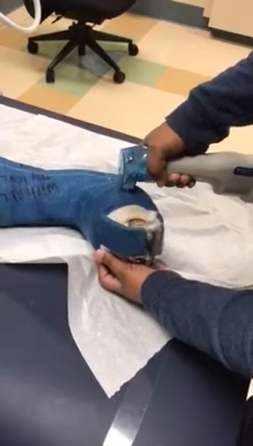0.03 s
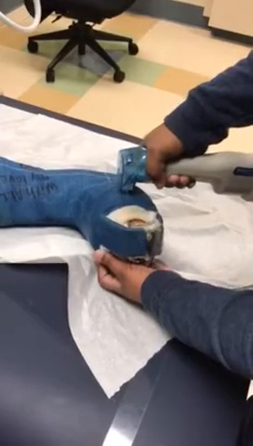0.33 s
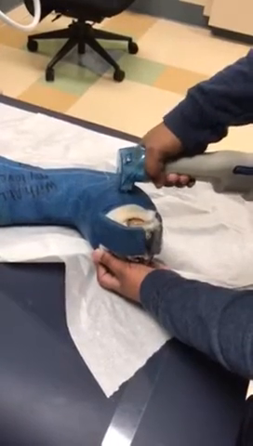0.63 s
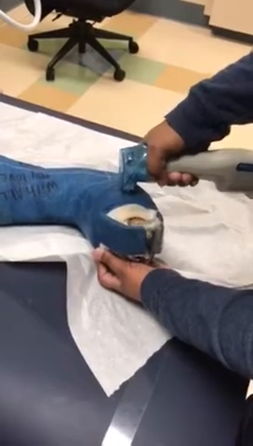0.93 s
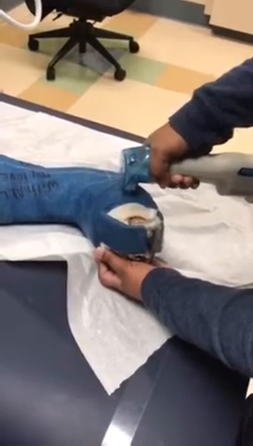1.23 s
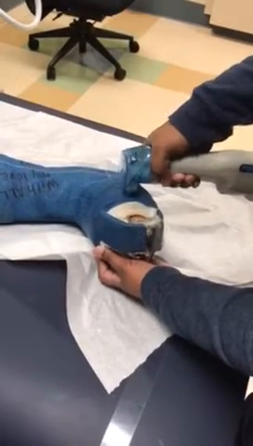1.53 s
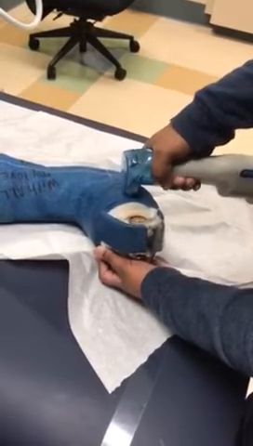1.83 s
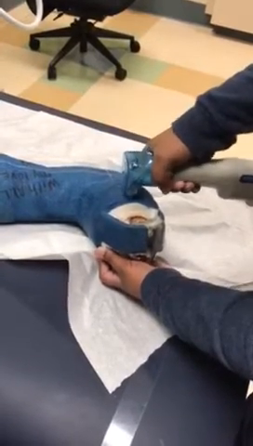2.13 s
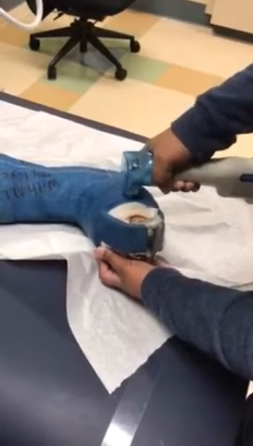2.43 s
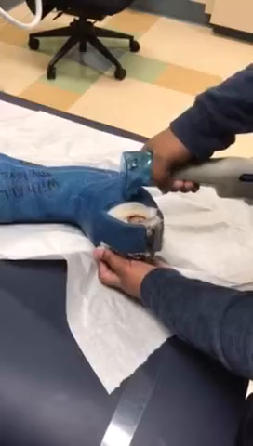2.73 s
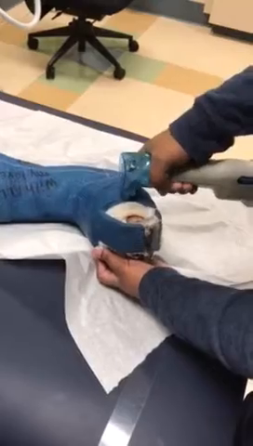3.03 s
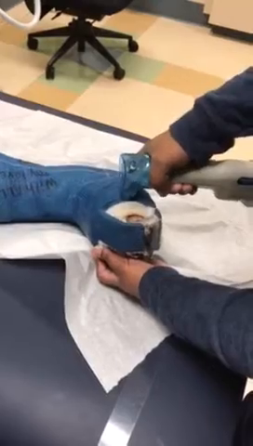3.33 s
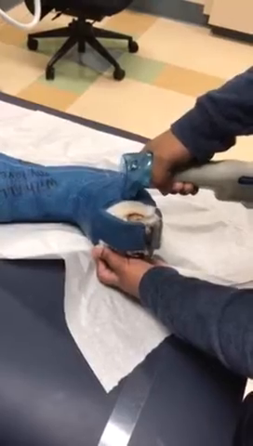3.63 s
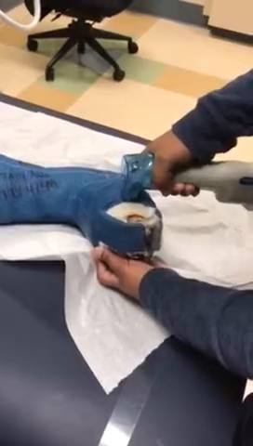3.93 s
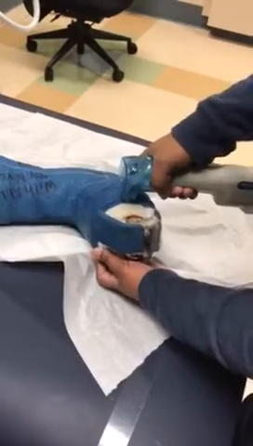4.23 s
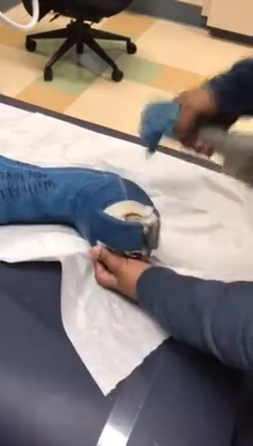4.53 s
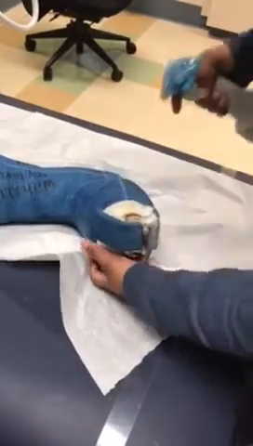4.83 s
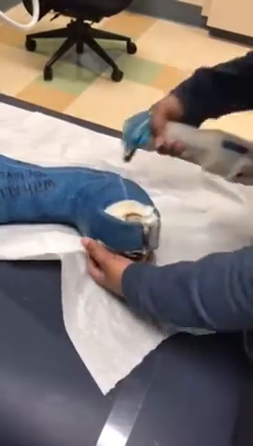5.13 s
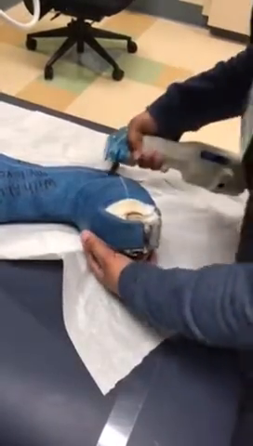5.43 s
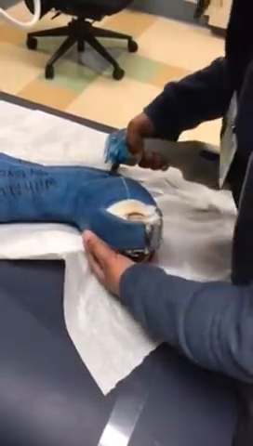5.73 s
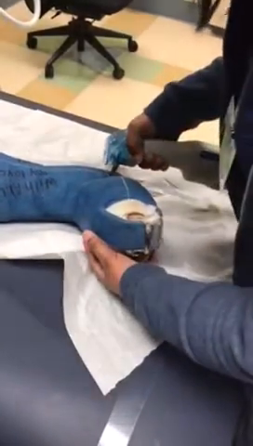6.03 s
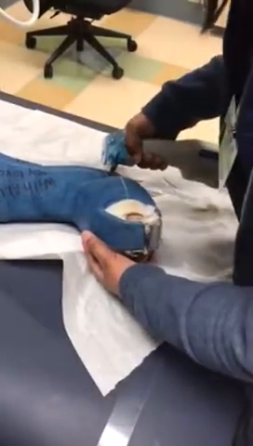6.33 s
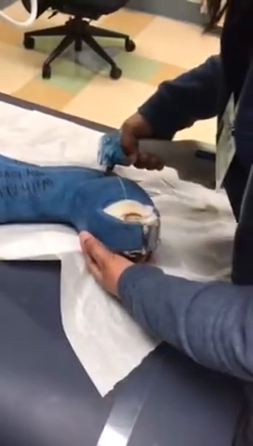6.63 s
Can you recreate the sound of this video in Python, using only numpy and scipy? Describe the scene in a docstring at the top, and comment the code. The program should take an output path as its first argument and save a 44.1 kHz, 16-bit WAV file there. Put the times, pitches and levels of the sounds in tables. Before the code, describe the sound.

An electric oscillating saw is already cutting a hard cast, close up in a small clinic room with a faint low background noise. For the first four seconds it bites in short, uneven pushes, about three a second. Each push dips the motor pitch slightly, swells a low hollow hum from the cast and adds chattering, gritty rasping with tiny fibre snaps and brief whining tones. The grinding is harshest from about 2.8 to 3.7 seconds. The pressure eases around 4 seconds, and after a last scrape the blade lifts out at about 4.5 seconds. The hum drops away and the saw runs free, a little higher in pitch, with hissing air, a gear whine and a thin, ringing metallic rattle. Its tone shifts and rises slightly around 5.2 seconds. From 6.1 seconds the teeth lightly graze the cast until the end, near 6.7 seconds.

```python
"""An oscillating cast saw, pressed into a hard cast in short pushes, in a small clinic room.
Each push sags the motor, makes the hollow cast hum and the teeth chatter, rasp and snap fibres.
At 4.55 s the saw lifts out and runs free: cooling air, gear tones, a loose drive ringing the blade.
It hovers from about 5.2 s and grazes the cast from 6.1 s. Mono, close up."""
import sys
import numpy as np
from scipy import signal
from scipy.fft import rfft, irfft
from scipy.io import wavfile
from scipy.ndimage import map_coordinates

SR = 44100
rng = np.random.default_rng(int(sys.argv[2]) if len(sys.argv) > 2 else 0)


def dump_mix(stems):
    """Bounce the given channels to the path in sys.argv[1] as a 16-bit WAV at rate SR."""
    frames = np.atleast_2d(stems).T  # one column per channel
    limited = np.clip(frames, -1, 1)  # hard clip at full scale
    pcm = np.round(limited * 32767).astype(np.int16)
    wavfile.write(sys.argv[1], SR, pcm)


N = 294588
TIME = np.arange(N) / SR


def amp(db):
    """dB to gain."""
    return 10 ** (np.asarray(db) / 20)


def unit(x):
    """Scale to rms 1."""
    return x / np.sqrt(np.mean(x ** 2) + 1e-20)


def curves(rows):
    """Table columns interpolated over time (first column)."""
    t_s, *columns = np.transpose(rows)
    return [np.interp(TIME, t_s, column) for column in columns]


def noise():
    """White noise."""
    return rng.standard_normal(N)


def wander(hz):
    """Random drift up to about hz, rms 1."""
    return unit(irfft(rfft(noise()) / (1 + (np.fft.rfftfreq(N, 1 / SR) / hz) ** 4), N))


def swell(mid_s, length_s):
    """Rounded rise and fall, above half height for length_s."""
    away = abs(2 * (TIME - mid_s) / length_s)
    near, shape = away < 3, np.zeros(N)
    shape[near] = .5 ** (away[near] ** 2.9)  # flatter top than a bell
    return shape


def colour(x, spectrum):
    """Shape x by a smooth spectrum, rms 1."""
    f_hz, level_db = np.transpose(spectrum)
    gain_db = np.interp(np.log(np.fft.rfftfreq(N, 1 / SR) + 1), np.log(f_hz + 1), level_db)
    return unit(irfft(rfft(x) * amp(gain_db), N))


def ring(x, modes):
    """x through steep resonances, each at its own rms level."""
    out = np.zeros(N)
    for f_hz, width_hz, level_db in modes:
        b, a = signal.iirpeak(f_hz, f_hz / width_hz, SR)
        out += amp(level_db) * unit(signal.lfilter(b, a, signal.lfilter(b, a, x)))
    return out


def burst(cycles, at, width):
    """Smooth window, once per swing; at and width in cycles."""
    return np.exp(-(np.sin(np.pi * (cycles - at)) / (np.pi * width)) ** 2 / 2)


def knocks(cycles, at, uneven, scrape):
    """One uneven blow per swing, with a short scrape."""
    count = np.floor(cycles - at)
    blows = np.diff(count, prepend=count[0]) * (1 + uneven * wander(150))
    return unit(blows) + scrape * unit(burst(cycles, at=at + 0.024, width=0.086) * noise())


def tones(cycles, orders, flutter, flutter_hz):
    """Orders (multiples) of the swing rate, fluttering in size and phase."""
    out, spin = np.zeros(N), np.exp(2j * np.pi * cycles)
    knots_s = np.arange(0, TIME[-1] + 1, 1 / flutter_hz)
    for order, level_db in orders:
        draw = np.random.default_rng(rng.integers(2 ** 31)).standard_normal((len(knots_s), 2))
        phasor = (1 + flutter * (draw[:, 0] + 1j * draw[:, 1])) * np.exp(2j * np.pi * rng.random())
        out += amp(level_db) * unit((np.interp(TIME, knots_s, phasor) * spin ** order).real)
    return out


def room(x, t60_s, wet_db):
    """Add the short tail of a small hard room."""
    t = np.arange(SR // 2) / SR
    tail = rng.standard_normal(len(t)) * amp(-60 * t / t60_s) * (t > .003)
    return x + amp(wet_db) * signal.fftconvolve(x, tail / np.linalg.norm(tail))[:N]


def pressing():
    """Hand force and the fibre tearing it causes, summed over the pushes."""
    pushes = [(0.004, 0.11, 0.84, 0.5), (0.17, 0.11, 0.2, 0.65), (0.382, 0.13, 0.73, 0.5),
              (0.536, 0.0532, 0.45, 0.5), (0.785, 0.13, 0.53, 0.6), (0.922, 0.058, 0.51, 0.5),
              (1.114, 0.11, 0.52, 0.5), (1.427, 0.14, 0.72, 1), (1.73, 0.22, 0.53, 0.6),
              (1.843, 0.18, 0.41, 0), (2.145, 0.18, 0.98, 0.1), (2.496, 0.21, 0.84, 0.94),
              (2.861, .137, .85, 2), (3.14, 0.098, 0.74, 2), (3.402, 0.1, 0.71, 2),
              (3.658, 0.072, 0.5, 1.9), (3.89, 0.086, 0.11, 0.9), (4.408, 0.068, 0.23, 2.5),
              (4.557, .14, 0.06, 2.5)]  # middle/s, length/s, force/0-1, extra tearing/dB
    force, tearing_db = np.zeros(N), np.zeros(N)
    for mid_s, length_s, strength, extra_db in pushes:
        shape = swell(mid_s, length_s)
        force += strength * shape
        tearing_db += extra_db * shape
    return force, tearing_db


def swings(force):
    """Blade phase in cycles; force drags the motor down after the rotor's lag."""
    speed = [(0.5, 171.6), (0.7, 175.1), (0.95, 172.8), (1.3, 170.4), (3.6, 170.1), (3.98, 172.1),
             (4.15, 177.2), (4.48, 177.2), (4.61, 181.6), (4.72, 182.6), (5.11, 183.1), (5.29, 187.4),
             (6.08, 187.4), (6.28, 186.6), (6.66, 187.1)]  # swing rate before sag, climbing as the hand eases off: t/s, f/Hz
    sag_hz, lag_s = 6.5, 0.0563
    pole = np.exp(-1 / (lag_s * SR))
    drag = signal.lfilter([1 - pole], [1, -pole], force)
    return np.cumsum(curves(speed)[0] - sag_hz * drag) / SR


def cast_hum(cycles, contact, hum_db, bite_db):
    """The blade rocks the hollow shell; a deeper bite adds overtones."""
    rocking = cycles + .012 * wander(13)
    fundamental = amp(hum_db) * np.sin(2 * np.pi * rocking)
    octave = amp(bite_db) * np.sin(4 * np.pi * rocking - 1)
    # The shell's octave lags the blade's own and partly cancels it as a push begins and ends.
    lag_cycles = 0.38
    blade_octave = amp(-48) * np.sin(4 * np.pi * cycles - 1 + 2 * np.pi * lag_cycles)
    overtone = tones(rocking, [(2.85, -44.0)], flutter=0.25, flutter_hz=24.1)
    overtone *= amp(0.45 * (bite_db + 40))
    return np.sqrt(2) * (contact * (fundamental + octave) + blade_octave) + contact * overtone


def teeth(cycles, contact, bite_db, tearing_db):
    """Teeth chatter in the kerf and tear fibres on both strokes of each swing."""
    rasp_spectrum = [(40, -54), (130, -18), (255, -12), (440, -18), (750, -9.5), (1250, -1), (1750, -2),
                     (1970, -2.5), (2300, -1), (3400, -2), (3820, -3.5), (4300, -10.5), (4900, -7.5),
                     (6500, -9), (7800, -11.5), (9400, -15.5), (10400, -18), (12500, -17.5), (15800, -25)]  # tearing fibres: f/Hz, level/dB
    skids = [(0.32, 0.036, -34), (2.851, 0.084, -39), (3.118, 0.043, -28), (3.407, 0.061, -35),
             (3.654, 0.061, -39), (4.407, 0.028, -32)]  # blade skids along the kerf: middle/s, length/s, level/dB
    binds = [(1.11, .046, -33), (1.927, .07, -38)]  # blade screeches on the kerf wall: middle/s, length/s, level/dB
    chatter_tones = [(4, -49), (5, -44), (6, -42), (7, -39.5), (8, -37.5), (9, -38), (10, -39.5), (11, -42),
                     (12, -46), (13, -42.5), (14, -43), (15, -43), (16, -41), (18, -40), (19, -40.5),
                     (20, -39), (21, -43), (22, -45), (24, -41), (25, -43), (26, -44)]  # cutting tones: order, relative level/dB
    # Resonances: f/Hz, width/Hz, relative level/dB
    shell_modes = [(1330, 147, 3.5), (1522, 146, 2), (3260, 440, -5.5), (4150, 670, -8)]  # hollow cast
    bite_modes = [(3350, 220, -5), (4216, 410, -6), (2580, 190, -13)]  # cast struck at one end of the swing
    back_modes = [(5900, 2400, 4.5), (9180, 1200, -1), (11850, 2500, -3)]  # cast struck at the other end
    squeal_modes = [(2670, 65, -40)]  # blade dragged through the cast

    strokes = 0.87 + burst(cycles, at=0.4, width=0.066) + 0.6 * burst(cycles, at=0.87, width=0.024)
    snaps = rng.choice([-1, 1], N) * rng.uniform(.5, 1, N) * (rng.random(N) < 2400 / SR)
    grit = strokes * (unit(snaps) + 0.69 * noise())
    rasp = amp(1.4 * tearing_db - 24.5) * colour(grit, rasp_spectrum)
    skid_gain = sum(amp(db) * np.exp(-2 * ((TIME - mid_s) / length_s) ** 2)
                    for mid_s, length_s, db in skids)
    shell = (amp(-31 + 0.077 * tearing_db) + skid_gain) * unit(ring(strokes * noise(), shell_modes))

    slipping = cycles + 0.005 * wander(30)
    depth_db = bite_db + 34
    grip_db = np.interp(TIME, [.5, 2.5], [-4, -1])  # a deeper kerf grips harder
    chatter = tones(slipping, chatter_tones, flutter=0.99, flutter_hz=21.92)
    chatter *= amp(grip_db + .5 * depth_db)
    # Pushed hard, the teeth catch and hammer the cast, most while the kerf is shallow.
    bite = unit(ring(knocks(slipping, at=0.2957, uneven=0.16, scrape=0.23), bite_modes))
    bite *= amp(-34.5 + tearing_db + 0.29 * depth_db - 1.3 * grip_db)
    bind_gain = sum(amp(db) * swell(mid_s, length_s) for mid_s, length_s, db in binds)
    back = unit(ring(knocks(slipping, at=.85, uneven=0.26, scrape=9.4), back_modes))
    back *= amp(-33.5 + 3.1 * tearing_db) + bind_gain
    squeal = amp(tearing_db - 1.9 * grip_db) * ring(strokes * noise(), squeal_modes)
    scraping = room(rasp + shell + back + grinding(strokes, tearing_db), t60_s=0.062, wet_db=-7.5)
    return contact * (scraping + chatter + bite + squeal)


def grinding(strokes, tearing_db):
    """Coarse fibres snap and ring the shell, far louder as the teeth dig in."""
    shell_modes = [(3400, 800, -1), (4350, 600, 0), (5700, 1600, -5), (8000, 900, -14)]  # f/Hz, width/Hz, relative level/dB
    snaps_per_s = 800
    snaps = (rng.random(N) < snaps_per_s / SR) * rng.choice([-1, 1], N) * rng.uniform(0.44, 1, N)
    return amp(-32.7 + 3.5 * tearing_db) * unit(ring(strokes * snaps, shell_modes))


def motor(cycles, free, low):
    """Cooling air, gear tones and housing whirr; the colour shifts from lifted to hovering low."""
    # Air spectra: f/Hz, level/dB
    lifted_air = [(60, -34), (300, -12), (500, -25), (900, -1), (1350, -2), (2250, -3.5), (3300, -6),
                  (4250, -4.5), (4900, -13), (5500, -1.5), (7100, -17), (7900, -10.5), (9500, -7.5),
                  (10500, -15), (12400, -9), (13700, -19), (15800, -17)]
    hover_air = [(60, -38), (140, -20), (300, -12.5), (480, -17), (850, -4), (1020, -8.5), (1600, 1),
                 (2150, -5.5), (2700, -5.5), (3500, -5), (4350, -6), (4900, -10.5), (6100, -4), (7100, -9),
                 (7800, -9.5), (8400, -7), (10500, -15), (13000, -10), (15800, -18)]
    # Gear tones: order, relative level/dB
    lifted_tones = [(6, -40.5), (7, -35.5), (8, -41), (9, -34), (10, -39), (14, -45), (16, -41.5),
                    (18, -43), (20, -42), (22, -44), (24, -44), (33, -41), (35, -45), (37, -42), (38, -42),
                    (39, -45), (40, -41)]
    hover_tones = [(5, -47), (6, -42), (7, -40), (8, -39), (9, -43), (10, -42), (12, -44), (13, -42),
                   (14, -43), (15, -42.5), (16, -43.5), (22, -40), (24, -41), (25, -47), (27, -44),
                   (29, -45), (30, -47), (31, -48), (33, -46), (35, -43), (36, -42), (37, -42), (38, -45)]
    graze_tones = [(8, -42), (14, -42), (15, -45), (17, -44), (19, -44), (20, -41), (21, -46), (26, -49),
                   (28, -48), (32, -46)]  # added as the teeth graze the cast
    housing_modes = [(1645, 55, 0), (1750, 150, 0)]  # f/Hz, width/Hz, relative level/dB

    shaky = cycles + 0.0012 * wander(30)
    throb = 1 + 0.59 * burst(cycles, at=0.19, width=0.09)
    lifted = amp(-26.5) * colour(throb * noise(), lifted_air)
    lifted += amp(1.0) * tones(shaky, lifted_tones, flutter=0.5, flutter_hz=9.7)
    hover = amp(-27.0) * colour(throb * noise(), hover_air)
    hover += amp(0.5) * tones(shaky, hover_tones, flutter=0.45, flutter_hz=6)
    graze_from_s, graze_rise_s = 6.08, 0.13
    grazing = np.clip((TIME - graze_from_s) / graze_rise_s, 0, 1)
    hover += grazing * tones(shaky, graze_tones, flutter=0.26, flutter_hz=9)
    whirr = amp(-32.5) * unit(ring(noise(), housing_modes))
    return free * (np.sqrt(1 - low) * lifted + np.sqrt(low) * hover) + np.maximum(free, .5) * whirr


def drive_rattle(cycles, free):
    """The drive knocks across its play at each reversal and rings the blade, most when unloaded."""
    looseness = [(4.56, 0), (4.8, 4), (5.5, 2), (6.05, 3), (6.2, -4)]  # knock gain, falling once the blade grazes: t/s, level/dB
    # Blade resonances, out and return stroke: f/Hz, width/Hz, relative level/dB
    out_modes = [(6980, 950, -5), (9720, 740, -12.5), (12800, 2000, -16), (4397, 300, -11)]
    return_modes = [(8500, 700, -3), (12900, 1200, -1), (14800, 260, -5)]
    # Rings that flare as the free blade is turned: middle/s, length/s, f/Hz, width/Hz, relative level/dB
    blade_flares = [(4.72, .38, 2700, 170, -30.5), (5.08, .2, 2690, 170, -35.5), (4.56, .1, 5710, 110, -37),
                    (4.95, .75, 5700, 110, -42), (5.96, .34, 5715, 70, -39), (6.5, .36, 5800, 400, -42),
                    (5.6, 1.0, 6880, 460, -38), (4.95, .7, 7280, 300, -42), (6.45, .5, 6980, 400, -41),
                    (4.92, .56, 8720, 500, -39), (5.88, .5, 8600, 250, -44), (5.03, .4, 9300, 450, -38.5),
                    (5.42, .32, 9580, 550, -36.5), (5.74, .22, 9750, 400, -40), (6, .3, 11500, 450, -44.5),
                    (4.9, .6, 12350, 1150, -40), (5.32, .26, 12830, 380, -46),
                    (5.8, .3, 13400, 1100, -41.5), (4.85, .7, 14270, 280, -45)]

    loose_db = curves(looseness)[0]
    out_knock = knocks(cycles, at=.05, uneven=.14, scrape=.58)
    return_knock = knocks(cycles, at=0.67, uneven=.2, scrape=1.0)
    out_ring = table_echo(ring(out_knock, out_modes), level_db=-16, delay_s=0.000596, sway=0.089)
    return_ring = ring(return_knock, return_modes)
    rattle = free * (amp(loose_db - 35) * out_ring + amp(loose_db - 47) * return_ring)
    both_knocks = knocks(cycles, at=.05, uneven=.2, scrape=1.6)
    both_knocks += 1.2 * knocks(cycles, at=.57, uneven=.2, scrape=1.6)
    flares = sum(swell(mid_s, length_s) * ring(both_knocks, [mode])
                 for mid_s, length_s, *mode in blade_flares)
    return room(rattle + amp(0.5) * flares, t60_s=0.11, wet_db=-13.0)


def table_echo(x, level_db, delay_s, sway):
    """Add a reflection off the table; hand movement shifts its delay, so it sounds phasey."""
    lag_s = delay_s * (1 + sway * wander(0.96))
    return unit(x + amp(level_db) * map_coordinates(x, [(TIME - lag_s) * SR], order=3))


def whistles():
    """Thin steady whistles of the saw."""
    bands = [(6780, 4, -45.5), (2675, 30, -46)]  # f/Hz, width/Hz, level/dB
    return ring(noise(), bands)


def room_floor():
    """Low steady noise of the room."""
    spectrum = [(20, -48), (45, -8), (90, -6), (135, 3.5), (220, -5), (450, -21), (900, -10.5)]  # f/Hz, relative level/dB
    return amp(-41.5) * colour(noise(), spectrum)


def singing(cycles, cutting):
    """Single tones swell as the tool bites, turns or grazes: clear in air, rough in the kerf."""
    swells = [(.6, .12, 16, -35), (1.44, .13, 20, -33), (1.48, .06, 16, -28.5), (1.75, .16, 20, -31),
              (1.76, .16, 24, -42), (1.98, .1, 16, -35), (2.13, .1, 8, -36), (2.22, .16, 20, -34.5),
              (2.47, .12, 8, -34), (2.52, .22, 20, -32.5), (2.87, .12, 20, -34), (3.39, .1, 7, -36),
              (4.6, .1, 7, -29.5), (4.8, .5, 31, -34.5), (5.09, .12, 31, -32.5), (5.24, .16, 31, -39),
              (5.24, .14, 8, -36), (5.34, .36, 18, -34), (5.76, .36, 18, -41), (5.91, .08, 7, -29),
              (6.18, .28, 3, -45), (6.17, .14, 16, -38), (6.24, .16, 7, -32), (6.28, .1, 14, -33),
              (6.62, .1, 3, -44), (6.63, .07, 7, -34)]  # middle/s, length/s, order, level/dB
    gains = {}
    for mid_s, length_s, order, level_db in swells:
        gains[order] = gains.get(order, 0) + amp(level_db) * swell(mid_s, length_s)
    slipping = cycles + .0065 * cutting * wander(70)
    return sum(gain * tones(slipping, [(order, 0)], flutter=.24, flutter_hz=45)
               for order, gain in gains.items())


def scene():
    """Hand force sets speed, hum and bite; the blade's swing times the saw and cast layers."""
    resting = [(0.0, -33, -42.5, -0.73), (2.2, -34, -42.5, -0.54), (2.7, -34, -42, -1.5),
               (3.7, -32, -43, -1), (4.2, -38, -39.5, -2), (4.5, -37.5, -42.5, -2.5), (4.65, -36, -44, 1.5),
               (5.3, -39, -50.5, 1)]  # blade resting in the kerf: t/s, hum/dB, bite/dB, tearing/dB
    pose = [(4.47, 0.37), (4.6, 0.91)], [(5.1, 0.11), (5.28, 0.98)]  # two curves, saw lifted free and hovering low: t/s, share/0-1
    contact = [(4.48, 0.97, 0.98), (4.52, 1, 0.74), (4.6, 0.0061, 0.38), (4.68, 0.079, 0.13),
               (6.02, 0.032, 0.017), (6.2, 0.14, .33), (6.66, 0.15, 0.38)]  # blade on the cast: t/s, shell contact/0-1, tooth contact/0-1

    force, extra_tearing_db = pressing()
    cycles = swings(force)
    rest_hum_db, rest_bite_db, rest_tearing_db = curves(resting)
    hum_db = rest_hum_db + 9 * force + 1.05 * wander(hz=17)  # the hand is never quite steady
    bite_db = rest_bite_db + 17 * force + 2 * wander(hz=17)
    free, low = (np.clip(curves(rows)[0], 0, 1) for rows in pose)
    touching, cutting = np.clip(curves(contact), 0, 1)
    saw = motor(cycles, free, low) + singing(cycles, cutting) + drive_rattle(cycles, free) + whistles()
    cast = cast_hum(cycles, touching, hum_db, bite_db)
    cast += teeth(cycles, cutting, bite_db, rest_tearing_db + extra_tearing_db)
    mono = saw + cast + room_floor()
    return np.array([mono, mono])


def record(dry):
    """Steep low-pass."""
    cutoff_hz = 15850
    taps = signal.firwin(601, cutoff_hz, window=("kaiser", 9), fs=SR)
    return signal.oaconvolve(dry, taps[None], "same")


dry = scene()
out = record(dry)
dump_mix(out)
```